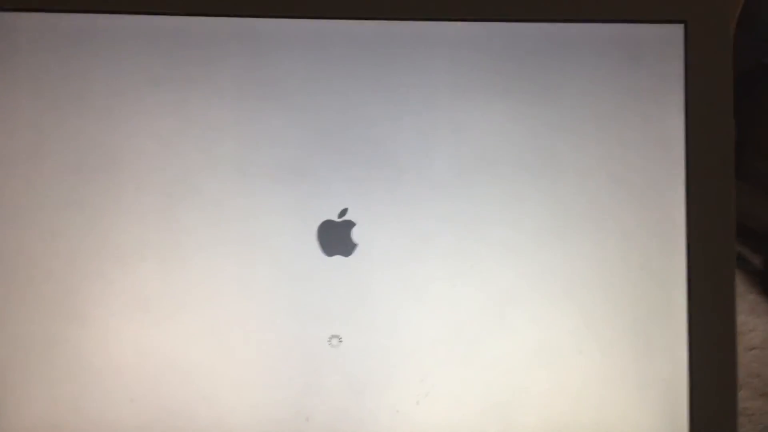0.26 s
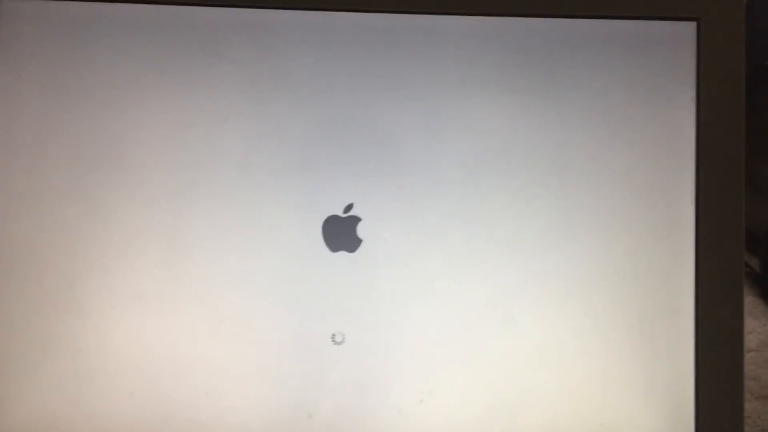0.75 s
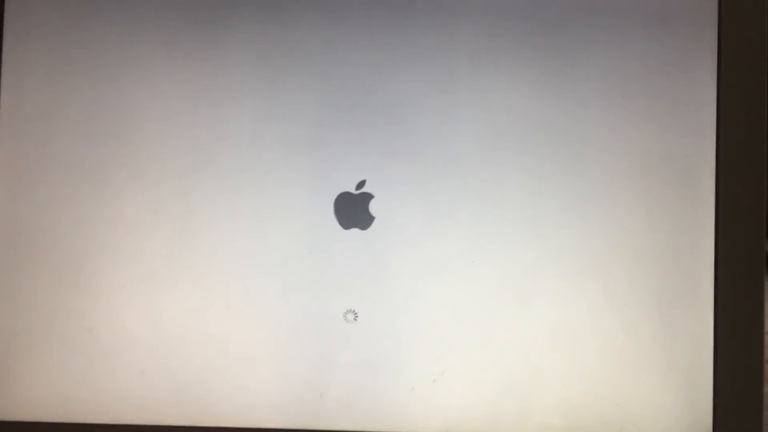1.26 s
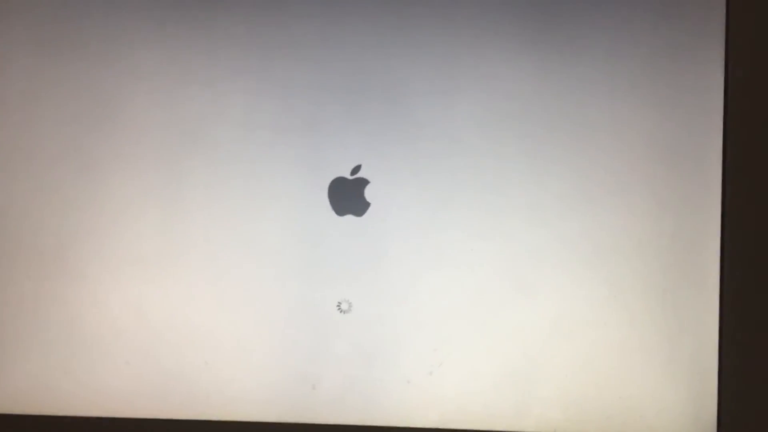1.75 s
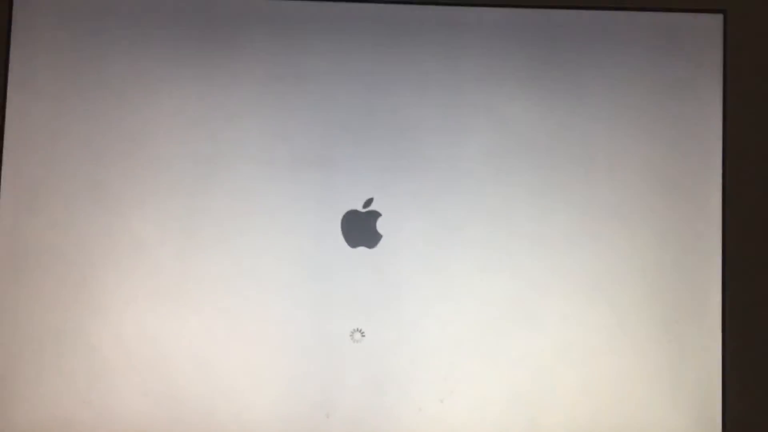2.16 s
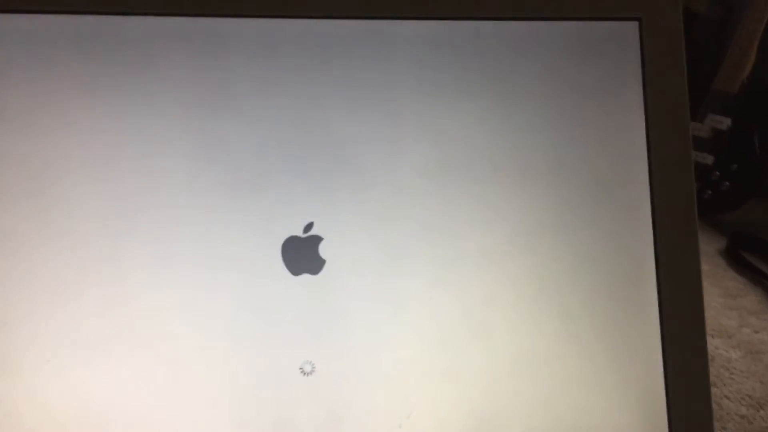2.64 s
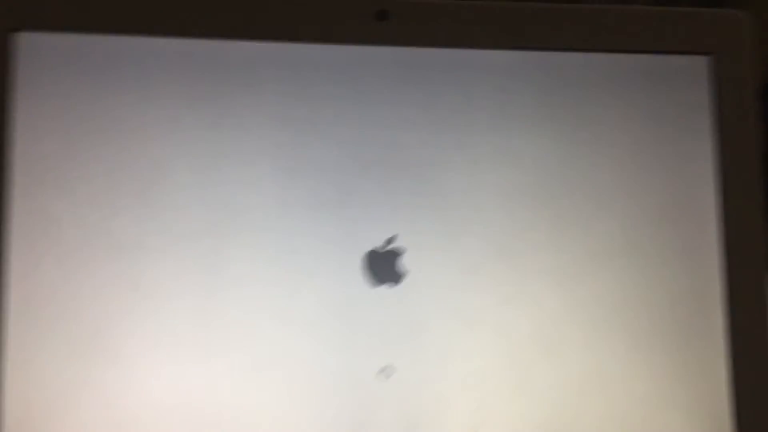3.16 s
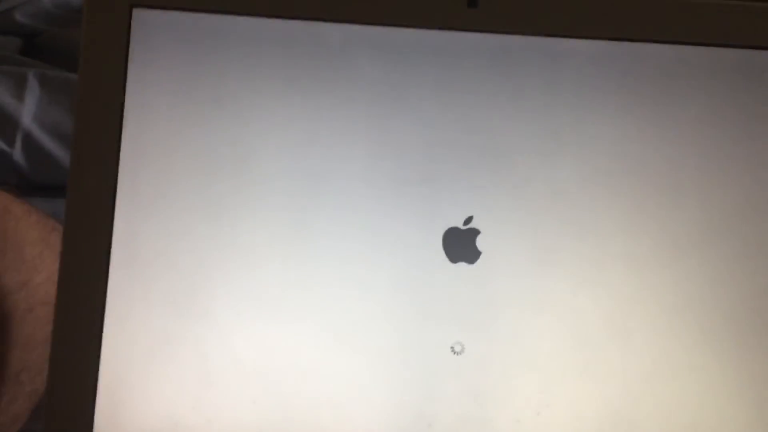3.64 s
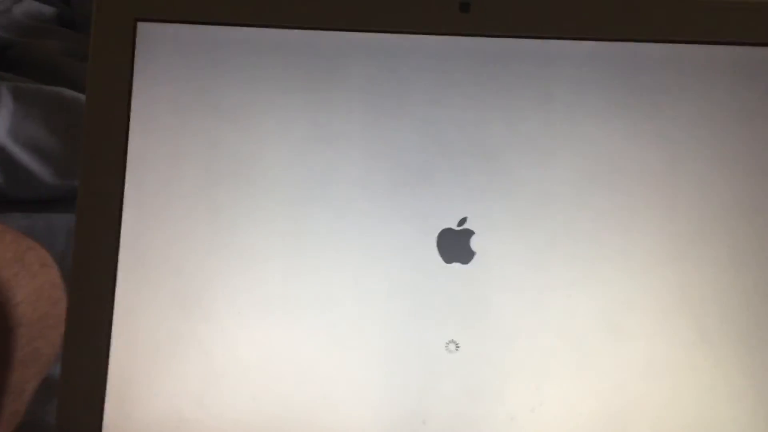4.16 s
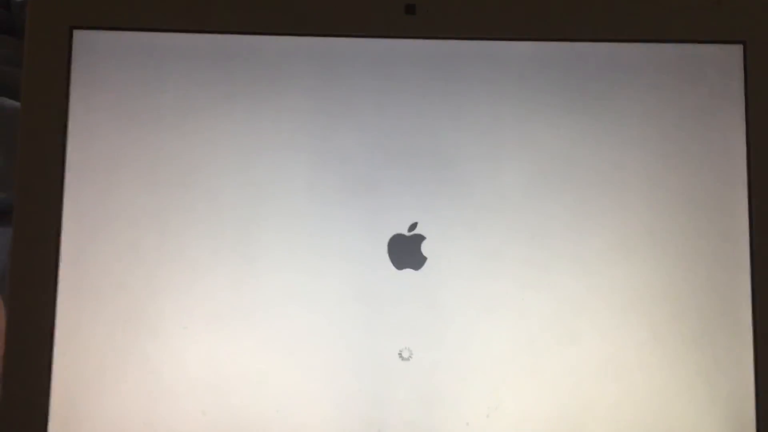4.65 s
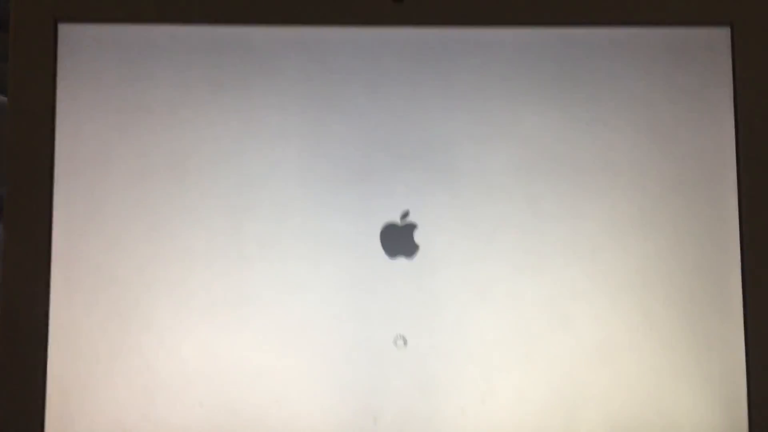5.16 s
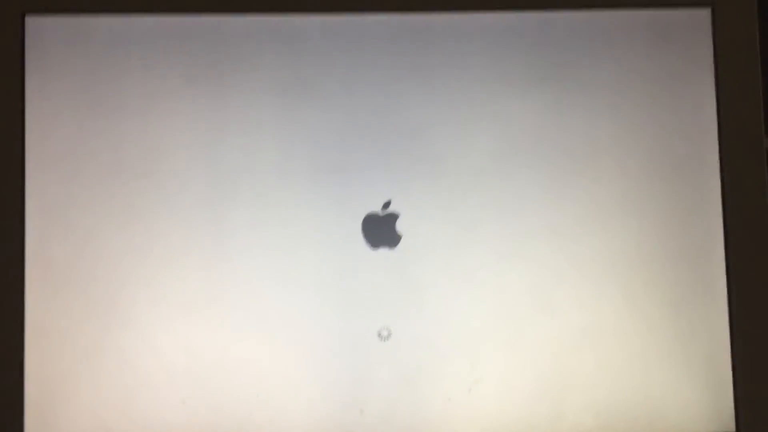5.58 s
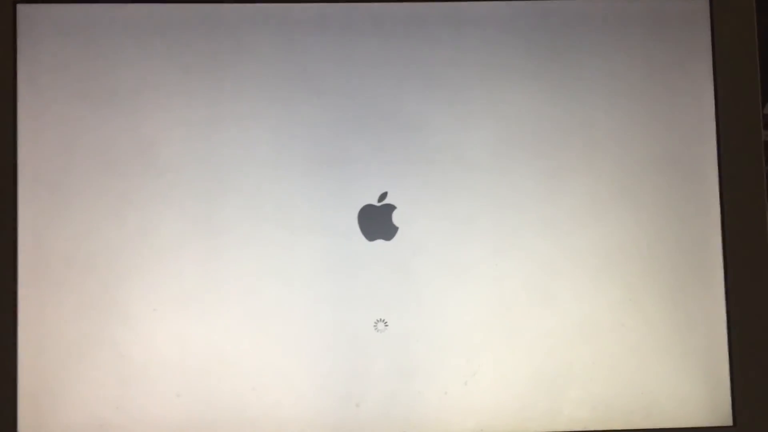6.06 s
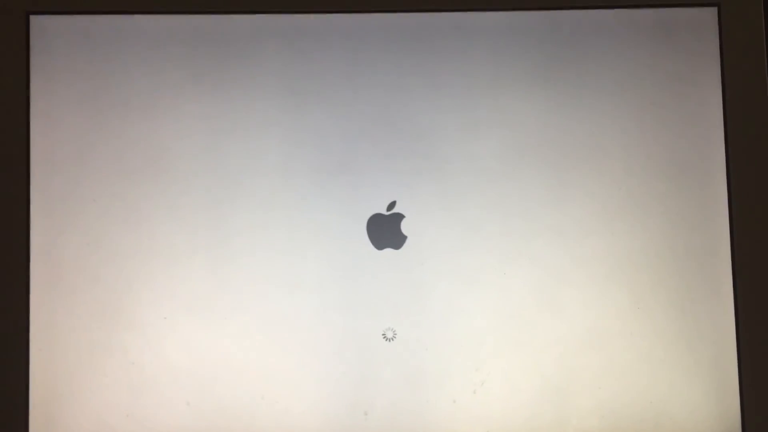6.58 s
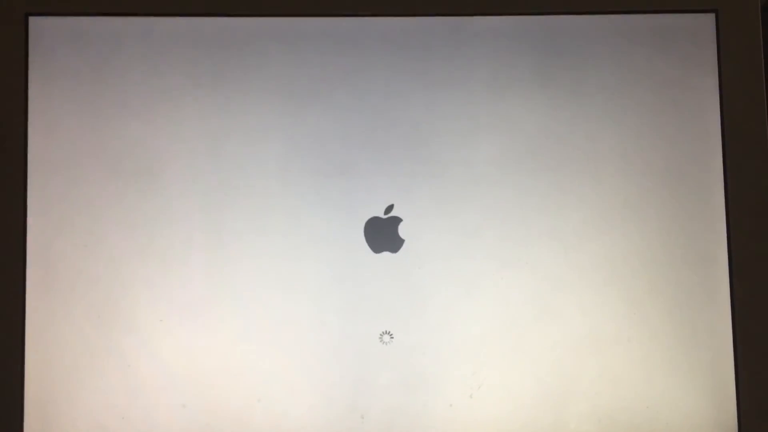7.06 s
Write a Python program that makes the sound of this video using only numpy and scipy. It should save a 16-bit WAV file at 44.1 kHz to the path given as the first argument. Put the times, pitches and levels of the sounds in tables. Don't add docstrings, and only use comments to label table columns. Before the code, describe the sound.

A laptop's worn fan rattles in a fast dry clatter with bright ticks and pings, over soft air and thin whines, stumbling now and then.

```python
import sys
import numpy as np
from scipy import signal
from scipy.fft import rfft, irfft, next_fast_len
from scipy.io import wavfile
from scipy.ndimage import map_coordinates

SR = 44100
rng = np.random.default_rng(int(sys.argv[2]) if len(sys.argv) > 2 else 0)


def field_ratio(decibels):
    return 10 ** (np.asarray(decibels, dtype=float) / 20)


def persist_wave(psi):
    counts = np.round(np.clip(psi, -1, 1) * 32767).astype(np.int16)
    wavfile.write(sys.argv[1], SR, np.atleast_2d(counts).T)


N = 322812
TIME = np.arange(N) / SR
PATTERN_HZ, TURNS = 15.99, 5
TURN_MS = 1000 / PATTERN_HZ / TURNS
# (time [s], nearness [dB], depth in a dead spot of the room [0-1])
PHONE_PLACE = [(0, 2, 0.74), (.36, 1.5, .01), (1.2, 2, .01), (2.15, 2.5, .01), (2.36, -0.1, 0.34),
               (3.15, 0.7, 0.66), (3.45, -1.5, .01), (4.4, 0.6, .01), (5, -0.4, 0.13), (5.9, -.9, 0.04),
               (6.6, 0.2, 0.04), (7.32, 0.7, .1)]


def case():
    # (time [ms], low case [dB], middle case [dB], high case [dB])
    knocks = [(4.666, -17, 3, 5.5), (7.952, 1.7, -1.5, 5.5), (10.5, 13.5, 17.4, -16.4),
              (13.837, -14, -8, 3.3), (15.742, 3, 27.5, 8), (19.595, -16, 2, 6), (19.82, 8.5, -1, 6.5),
              (22.88, 0, -30, 0), (25.93, -9, 15, 10), (29, -11, 14.5, 3.5), (31.6, 2, -13, 9.5),
              (33.68, 2.7, -5, 2.8), (35.8, 9, -24, -6), (40.92, 5, -9, -3.5), (44.52, -6, -13.3, 10.5),
              (46.76, 5, -14, -9.5), (48.35, 13, -12, -2.5), (53.61, 8, -0.5, 3.8), (57.92, 10, 11, -8),
              (59.02, 10.5, -19, 5.5), (61.05, 11, -10, -19.6)]
    # (frequency [Hz], width [Hz], level [dB])
    low_case = [(287, 21, 0), (401.4, 23, -8.5), (520.9, 32, 6.5), (534, 114, 7), (596.3, 101, 8.5)]
    # (frequency [Hz], width [Hz], level [dB])
    middle_case = [(784.3, 29, -3), (1026, 190, -8), (1163, 43, -7), (1303.5, 50, -6.5), (1467, 610, -14.5)]
    # (frequency [Hz], width [Hz], level [dB])
    high_case = [(1682, 57, 11.5), (1823, 90, 5.5), (2012, 80, -1.5), (2251, 146, -7.5)]
    clack_late_s = .0013

    ms, low_db, middle_db, high_db = np.transpose(knocks)
    when = moments(ms, steady_ms=.018)
    vary = field_ratio(.6 * rng.standard_normal(when.shape))
    low_hits = pulses(when, vary * field_ratio(low_db))
    middle_hits = pulses(when + clack_late_s, vary * field_ratio(0.39 * middle_db))
    high_hits = pulses(when, vary * field_ratio(.9 * high_db))
    sharp_hits = pulses(when, vary * field_ratio(.5 * middle_db))

    boom = unit(filtered(low_hits, ringing(low_case, 200, 730)))
    clack = unit(filtered(middle_hits, ringing(middle_case, 830, 1700)))
    ring = unit(filtered(high_hits, ringing(high_case, 1530, 3300)))
    snap = unit(filtered(sharp_hits, ringing([(2480, 250, 0)], 1390, 3370)))
    direct = layer_gain(0) * boom + layer_gain(1) * clack + layer_gain(2) * (ring + field_ratio(-26) * snap)
    return direct + standing_waves(boom + clack + ring)


def ticks():
    # (time [s], share of the bright colour [0-1])
    facing = [(0, 0.15), (1.5, 0), (2.6, .05), (3.1, 0.2), (3.35, 0.4), (4.3, 0.4), (4.55, 0.8), (5.2, .9),
              (5.7, 0.6), (6.3, 0.5), (6.9, 0.6), (7.32, 0.9)]
    # (frequency [Hz], level [dB])
    dull_colour = [(2000, -41), (2800, -9.5), (3500, -9.5), (5000, -3.5), (6500, -3), (7500, -7.5),
                   (8600, -16), (10000, -6), (11600, -13.5), (12600, -10.5), (15700, -35)]
    # (frequency [Hz], level [dB])
    bright_colour = [(2000, -30), (2800, -3), (3400, -15.5), (4800, 0), (6300, -8), (7500, -3.5),
                     (8600, -15), (10500, -7.5), (11600, -1), (12300, -9), (13200, -3), (14300, -15),
                     (15700, -38)]

    ms, db = tick_pattern()
    when = moments(ms - .45, steady_ms=.02)
    starts = pulses(when, field_ratio(db + 1.8 * rng.standard_normal(when.shape)))
    fade = np.sqrt(TIME[:500]) * np.exp(-TIME[:500] / .0008)
    fresh = np.convolve(starts, fade)[:N] * rng.standard_normal(N)
    alike = np.convolve(starts, fade * rng.standard_normal(fade.shape))[:N]
    bursts = unit(fresh) + 1.03 * unit(alike)

    dull = unit(filtered(bursts, lambda hz: along(dull_colour, hz)))
    bright = unit(filtered(bursts, lambda hz: along(bright_colour, hz)))
    share = np.clip(np.interp(TIME, *np.transpose(facing)), 0, 1)
    return field_ratio(6) * layer_gain(3) * ((1 - share) * dull + share * bright)


def tick_pattern():
    # (time into the turn [ms], level [dB], swing over the pattern [dB], hardest turn [turns])
    met = [
        (4.1, -1.5, 6, 1.1),
        (6.9, -2.5, 5.5, 1.4),
        (8.6, 0.5, 2.5, 0.79),
        (10.6, -0.5, 0.5, 1.5),
    ]
    late_ms = 0.597

    ms, db, swing_db, hardest = np.transpose(met)
    turn = np.arange(TURNS)[:, None]
    late = late_ms * (turn > 2) * ms / ms.mean()
    hard = db + swing_db * np.cos(2 * np.pi * (turn - hardest) / TURNS)
    return (turn * TURN_MS + ms + late).ravel(), hard.ravel()


def pings():
    # (time [ms], level [dB])
    hard_blows = [
        (4.0, -6),
        (16.5, 4),
        (29.1, 0),
        (43.6, 0),
        (56.5, -5),
    ]
    # (frequency [Hz], width [Hz], level [dB])
    body_ring = [(2840, 810, 0)]
    # (frequency [Hz], width [Hz], level [dB])
    low_ring = [(9800, 800, 0)]
    # (frequency [Hz], width [Hz], level [dB])
    high_ring = [(11800, 900, 0)]

    ms, db = np.transpose(hard_blows)
    when = moments(ms, steady_ms=.03)
    blows = pulses(when, field_ratio(db + 1.9 * rng.standard_normal(when.shape)))
    crack = np.convolve(blows, np.exp(-TIME[:100] / 0.00032))[:N] * rng.standard_normal(N)
    low = unit(filtered(crack, ringing(low_ring, 7000, 13500)))
    high = unit(filtered(crack, ringing(high_ring, 7000, 13500)))
    body = unit(filtered(blows, ringing(body_ring, 2100, 3160)))

    s, _, dead = np.transpose(PHONE_PLACE)
    share = np.clip(.35 + .6 * np.interp(TIME, s, dead), 0, 1)
    return layer_gain(3) * (field_ratio(-5.5) * (share * low + (1 - share) * high) + field_ratio(-1) * body)


def chatter():
    loose = rng.standard_normal(N) * (rng.random(N) < .012)
    ring = ringing([(1280, 530, -8.0), (1900, 250, 2.5)], 530, 2630)
    return field_ratio(-32) * stumble(TIME) * unit(filtered(loose, ring))


def moments(ms, steady_ms):
    s = np.arange(-1, N / SR * PATTERN_HZ)[:, None] / PATTERN_HZ + ms / 1000
    due = s + lag(s) / 1000
    skipped = due < np.maximum.accumulate(due.ravel()).reshape(due.shape)
    scatter = (steady_ms + stumble(s)) * rng.standard_normal(s.shape) / 1000
    return np.where(skipped, -1, due + scatter)


def stumble(s):
    # (time [s], length [s], scatter of the knocks [ms])
    stumbles = [
        (0.106, 0.24, 0.13),
        (1.198, .06, 0.076),
        (2.11, 0.092, 0.13),
        (2.87, 0.11, 0.052),
        (3.3, 0.17, 0.18),
        (4.424, 0.044, 0.084),
        (5.5, 0.11, 0.15),
        (7.127, 0.12, 0.096),
    ]
    return sum(deep * np.exp(-((s - at) / long) ** 2) for at, long, deep in stumbles)


def lag(s):
    # (time [s], lag [ms])
    drift = [(0, 7.55), (.5, 7.5), (1.1, 6.2), (1.41, 6.05), (2.05, 4.65), (3.05, 6.35), (3.22, 6.35),
             (3.33, 5.7), (4.28, 5.85), (4.7, 6.3), (5.41, 5.8), (5.8, 5.9), (6.54, 5.16), (6.97, 5.1),
             (7.2, 5.55)]
    # (time [s], slip [ms])
    slips = [
        (.03, 1.9),
        (3.42, 3.6),
        (5.48, 1.5),
    ]
    settle_s, skip_s = .14, 3.33

    slipped = sum(ms * (1 - np.exp(-np.clip(s - at, 0, None) / settle_s)) for at, ms in slips)
    return np.interp(s, *np.transpose(drift)) + slipped - (s > skip_s) * TURN_MS


def hum():
    # (multiple of the pattern rate [count], level [dB rms])
    orders = [(5, -103), (15, -72)]
    patterns = PATTERN_HZ * (TIME - lag(TIME) / 1000)
    return sum(field_ratio(db + 1) * np.sin(2 * np.pi * order * patterns) for order, db in orders)


def fan():
    # (frequency [Hz], level per Hz [dB])
    air_colour = [(45, -39), (62, -43), (100, -22.5), (200, -14.5), (400, -12.5), (850, -9), (1400, -6),
                  (1700, -11.5), (2100, -8.5), (3300, -22), (5500, -15), (7500, -21.5), (8500, -30.5),
                  (15700, -31)]
    # (frequency [Hz], level [dB rms], unsteadiness [dB])
    whines = [(77.5, -80.5, .8), (118.4, -83, 2), (3025, -84, 3), (3664, -88, 3), (3741.5, -77, 2),
              (4769, -83, 3), (9739, -89, 4)]
    turned_s, turned_for_s, turned_db = 3.7, 2.1, 9

    air = field_ratio(-54) * unit(filtered(rng.standard_normal(N), lambda hz: along(air_colour, hz)))
    out = air * heard(0.25, 0.26, 1.2, .1)
    toward_coil = turned_db * (np.exp(-((TIME - turned_s) / turned_for_s) ** 2) - .6)
    for hz, db, deep in whines:
        gain = field_ratio(db + 3 + deep * wobble(1.78) + (hz > 1000) * toward_coil)
        out += gain * np.sin(2 * np.pi * hz * TIME + wobble(2.8))
    return out


def handling():
    # (time [s], peak level [dB], frequency [Hz], width [Hz], ring time [ms])
    touches = [
        (.625, -56, 12500, 4000, 6),
        (.881, -46, 11800, 4000, 4),
        (.921, -54, 165, 30, 7),
        (1.1, -55, 4450, 250, 16),
        (1.158, -57, 185, 40, 6),
        (1.328, -55, 13000, 3000, 4),
        (2.2112, -35, 4200, 900, .3),
        (2.352, -51, 225, 50, 7),
    ]
    out = np.zeros(N)
    for s, db, hz, width, ms in touches:
        t = np.clip(TIME - s, 0, .2) * 1000 / ms
        swell = t * np.exp(1 - t)
        partials = hz + width * rng.uniform(-1, 1, (90, 1))
        span = slice(int(s * SR), int((s + .1) * SR))
        tap = np.sin(2 * np.pi * partials * (TIME[span] - s)).sum(0) * swell[span]
        out[span] += field_ratio(db) * tap / np.abs(tap).max()
    return out


def standing_waves(x):
    # (frequency [Hz], width [Hz])
    bands = [(320, 7), (400, 7), (560, 7), (1425, 45), (1696, 7)]
    # (level [dB rms], per dB of nearness [dB], in the dead spot [dB], per ms of stumble [dB])
    lifts = [(-72, -2, 13, 21), (-72, 2.24, 7, -7), (-69, 3, 4.5, 32), (-65, 3.5, -21, -37),
             (-59.5, -0.1, -1.5, -20)]
    out = np.zeros(N)
    for (centre, width), lift in zip(bands, lifts):
        narrow = filtered(x, lambda hz: np.exp(-((hz - centre) / width) ** 2))
        out += heard(*lift) * unit(narrow)
    return out


def desk_echo(x):
    late_s = (.45 + .03 * wobble(.8)) / 1000
    return x + field_ratio(-17) * map_coordinates(x, [(TIME - late_s) * SR])


def late_shade(x):
    # (frequency [Hz], width [Hz], share lost [0-1])
    shaded = [(3160, 620, 0.42), (118, 14, .4)]
    shade_s, shade_over_s = 5.2, .25
    lost = filtered(x, lambda f: sum(share * np.exp(-((f - hz) / width) ** 2) for hz, width, share in shaded))
    return x - lost / (1 + np.exp((shade_s - TIME) / shade_over_s))


def layer_gain(row):
    # (level [dB rms], per dB of nearness [dB], in the dead spot [dB], per ms of stumble [dB])
    layers = [
        (-50.5, -0.28, -6, -0.5),
        (-53, -0.07, 0, 12),
        (-47, 0.94, 0.4, -24),
        (-67.5, 0.17, -0.4, 10),
    ]
    return heard(*layers[row])


def heard(db, near, dead_db, shaken_db):
    s, nearness, dead = np.transpose(PHONE_PLACE)
    place_db = near * np.interp(TIME, s, nearness) + dead_db * np.interp(TIME, s, dead)
    return field_ratio(db + place_db + shaken_db * stumble(TIME))


def unit(x):
    return x / np.sqrt(np.mean(x ** 2) + 1e-20)


def along(points, hz):
    f, db = np.transpose(points)
    return field_ratio(np.interp(np.log(hz + 1), np.log(f + 1), db))


def filtered(x, response):
    m = next_fast_len(N + SR)
    return irfft(rfft(x, m) * response(np.fft.rfftfreq(m, 1 / SR)), m)[:N]


def ringing(modes, low_hz, high_hz):
    def response(f):
        body = 0
        for k, (c, w, db) in enumerate(modes):
            sign = (-1) ** k
            body = body + sign * field_ratio(db) * 1j * f * w / (c * c - f * f + 1j * f * w)
        return body / (1 + (low_hz / (f + 1)) ** 12) / (1 + (f / high_hz) ** 12)
    return response


def pulses(times, sizes):
    at = times.ravel() * SR
    taps = np.floor(at)[:, None] + np.arange(-7, 9)
    away = taps - at[:, None]
    shape = np.sinc(away) * np.cos(np.pi * away / 16) ** 2
    inside = (taps >= 0) & (taps < N)
    return np.bincount(taps[inside].astype(int), (shape * sizes.ravel()[:, None])[inside], N)


def wobble(rate):
    return map_coordinates(rng.standard_normal(int(N * rate / SR) + 4), [TIME * rate])


def scene():
    rattle = case() + desk_echo(ticks()) + pings() + chatter()
    background = hum() + fan() + handling()
    return late_shade(rattle + background)[None]


def roll_off(x):
    return signal.sosfilt(signal.butter(12, 15700, fs=SR, output="sos"), x)


def record(dry):
    duck_s, duck_db, recover_s = 2.4, -1, 1
    recovery = np.exp(-np.clip(TIME - duck_s, 0, None) / recover_s)
    mix = dry * field_ratio(duck_db * (TIME > duck_s) * recovery)
    return roll_off(mix)


dry = scene()
out = record(dry)
persist_wave(out)
```